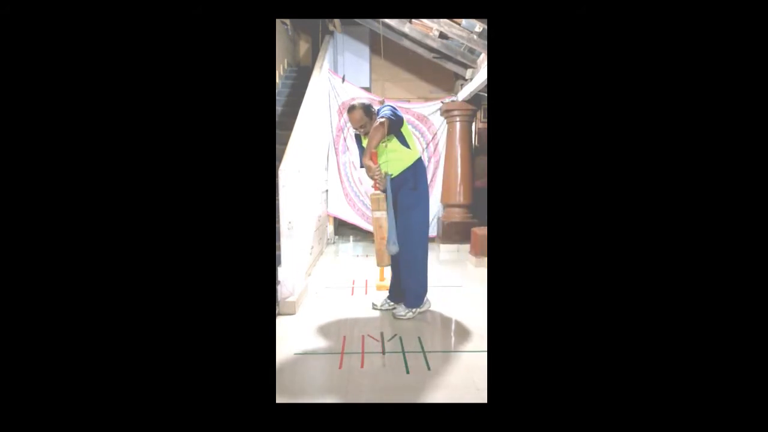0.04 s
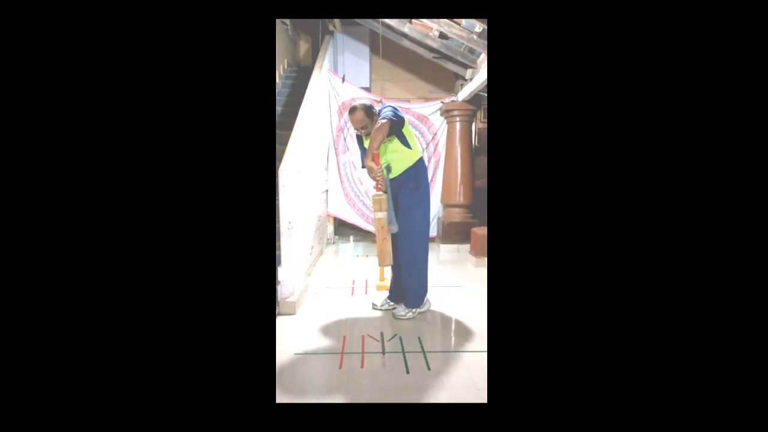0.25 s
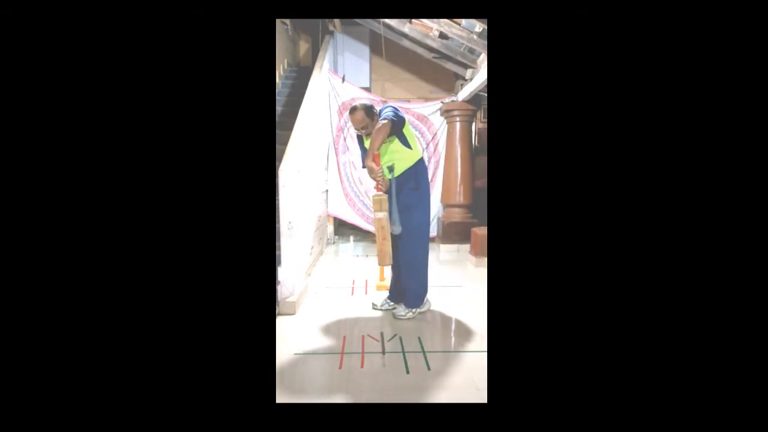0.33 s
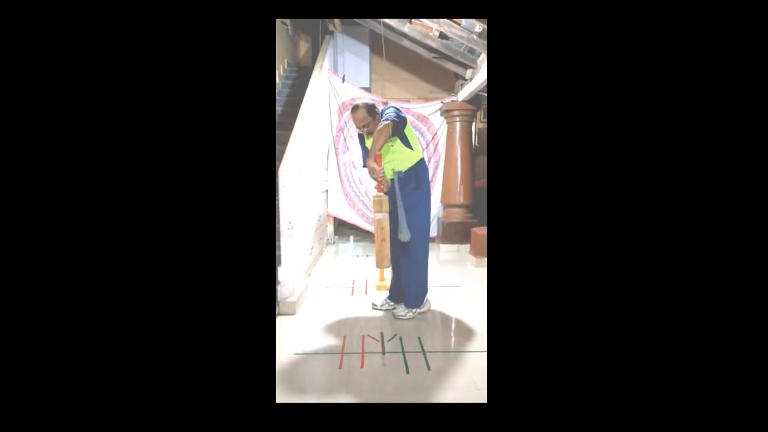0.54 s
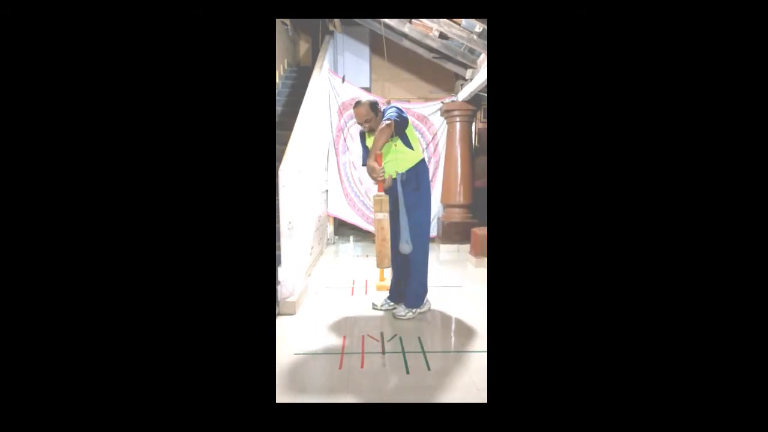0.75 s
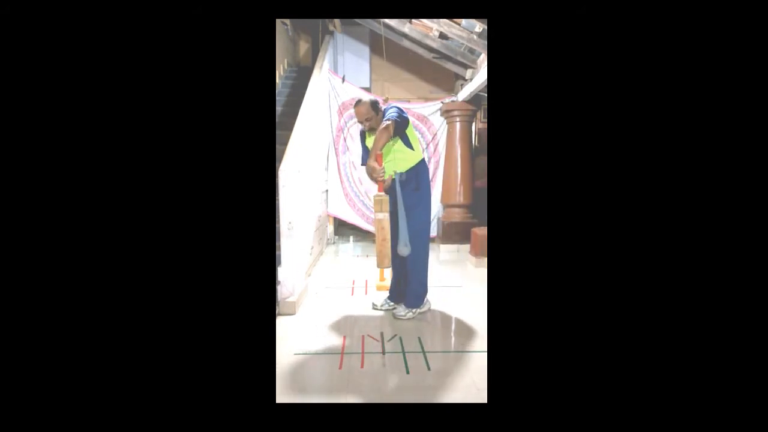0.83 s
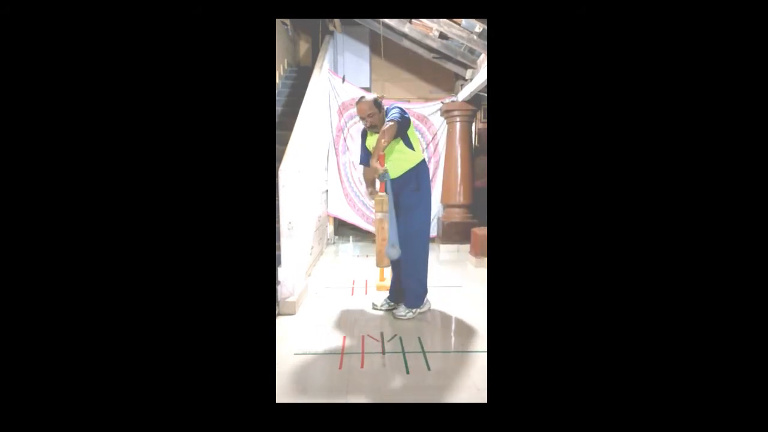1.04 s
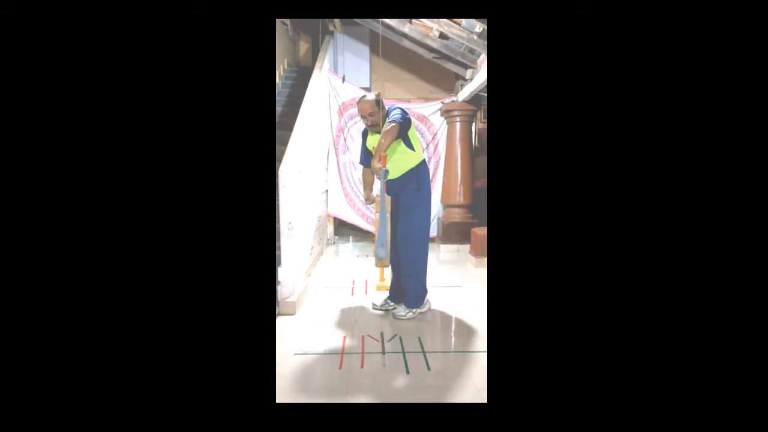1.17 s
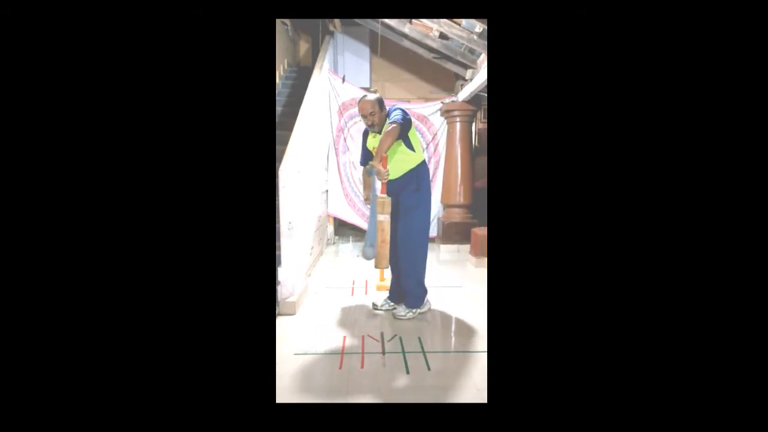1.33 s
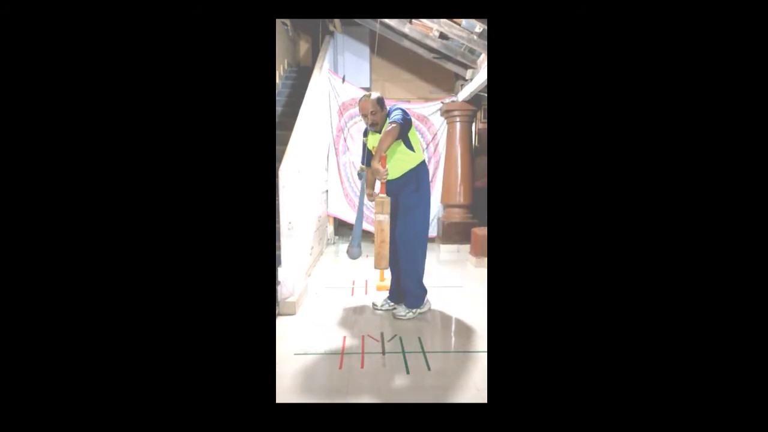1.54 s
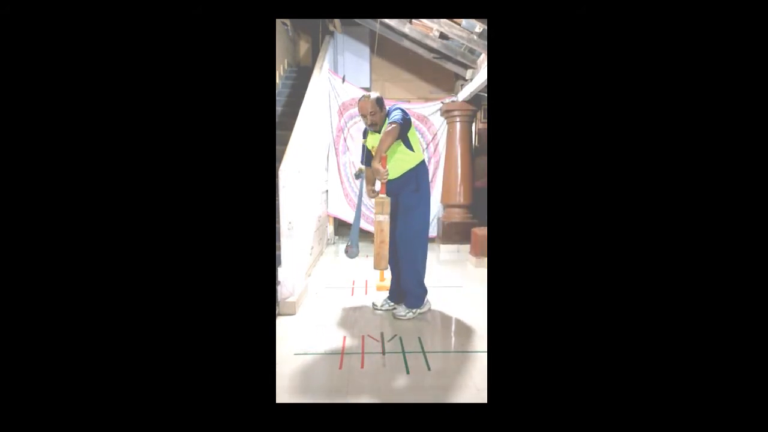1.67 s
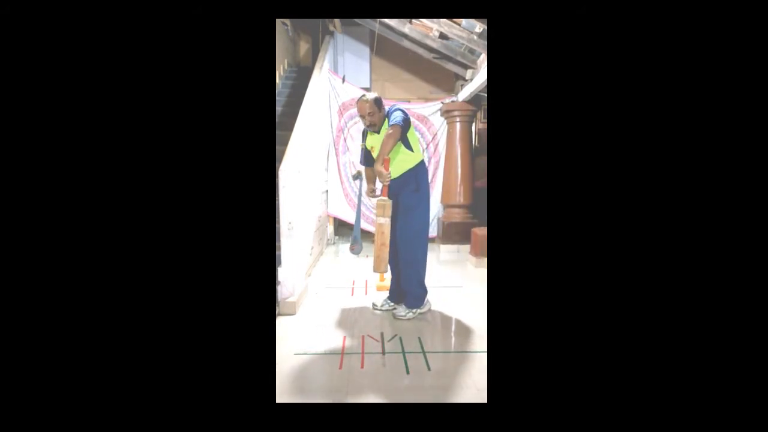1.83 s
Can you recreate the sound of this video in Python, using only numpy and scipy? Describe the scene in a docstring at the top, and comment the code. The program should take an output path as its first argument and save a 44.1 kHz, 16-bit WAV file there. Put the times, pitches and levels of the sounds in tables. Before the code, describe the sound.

At about 0.2 seconds a wooden cricket bat hits a hanging ball with one sharp knock, which rings in the hard room for roughly half a second. Faint rubbing from the cord follows. Near 1.1 seconds it becomes a quiet, thin squeal, drops to a lower buzzy squeak around 1.4 seconds, and jumps high again from 1.6 to about 1.9 seconds, over very faint room noise.

```python
"""Bat on a hanging cricket ball

One strike in a hard-floored practice room: the knock slaps off the walls and rings out.
The ball swings away with a faint rubbing, probably of its cord at the hanging point. On the way back
the rubbing turns into a stick-slip squeal, which drops to a lower, buzzier squeak and jumps up again."""
import sys
import numpy as np
from scipy import signal
from scipy.io import wavfile

SR = 44100
rng = np.random.default_rng(int(sys.argv[2]) if len(sys.argv) > 2 else 0)


def to_wav(s):
    """Save 16-bit WAV."""
    ch = np.atleast_2d(s).T  # columns
    pcm = np.round(np.clip(ch, -1, 1) * 32767)  # PCM
    wavfile.write(sys.argv[1], SR, pcm.astype(np.int16))


N = 83790
T = np.arange(N) / SR


def from_db(db):
    """Decibels to gain."""
    return 10 ** (np.asarray(db) / 20)


def rms_one(x):
    """Scale to rms 1."""
    return x / np.sqrt(np.mean(x ** 2) + 1e-20)


def in_time(rows):
    """Each column of a time curve at every sample."""
    time_s, *columns = np.transpose(rows)
    return [np.interp(T, time_s, column) for column in columns]


def at_hz(points, hz):
    """Interpolate on a log-frequency axis."""
    freq_hz, values = np.transpose(points)
    return np.interp(np.log(hz), np.log(freq_hz), values)


def pan(db):
    """Stereo gains, left over right by db."""
    return from_db(np.vstack([db, -db]) / 2)


def butter(x, hz, kind="low", order=2):
    """Butterworth filter."""
    return signal.sosfilt(signal.butter(order, hz, kind, fs=SR, output="sos"), x + 1e-18)


def delay(x, delay_s):
    """Shift later in time."""
    return np.interp(T - delay_s, T, x, left=0)


def decay(t60_s):
    """Envelope falling 60 dB in t60_s."""
    return from_db(-60 * T / t60_s)


def ring(hz, t60_s, phase_rad=0):
    """A struck mode of unit amplitude."""
    return np.sin(2 * np.pi * hz * T + phase_rad) * decay(t60_s)


def drift(rate_hz):
    """Smooth random wander, rms about 1."""
    pole = np.exp(-2 * np.pi * rate_hz / SR)
    wander = signal.lfilter([1], [1, -2 * pole, pole * pole], rng.standard_normal(2 * N))
    return rms_one(wander)[N:]


def slip_phase(hz, jitter):
    """Running phase of an unsteady stick-slip vibration."""
    return 2 * np.pi * np.cumsum(hz * (1 + jitter * drift(rate_hz=130))) / SR


def hoarse(phase, rasp, width_hz):
    """A partial of rms 1, from pure tone (rasp 0) to narrow-band noise (rasp 1)."""
    a, b = rms_one(butter(butter(rng.standard_normal((2, N)), width_hz), width_hz))
    steady = np.sqrt(2 * (1 - rasp ** 2)) * np.sin(phase)
    return steady + rasp * (a * np.sin(phase) + b * np.cos(phase))


# Diffuse field: freq_hz, left_right_correlation
COHERENCE = [(40, 1), (150, 0.88), (300, 0.82), (600, -0.0043), (1200, -0.21), (3000, 0.15), (6000, -0.13),
             (12000, 1)]


def noise_bands():
    """Third-octave bands of stereo room noise: centres and signals."""
    edges_hz = 22 * 2 ** (np.arange(30) / 3)
    centres_hz = np.sqrt(edges_hz[1:] * edges_hz[:-1])
    white = rng.standard_normal((2, 2, N + SR // 2))
    bands = []
    for k, alike in enumerate(at_hz(COHERENCE, centres_hz)):
        mid, side = butter(white[k % 2], edges_hz[k:k + 2], "band", order=3)[:, -N:]
        bands.append(np.sqrt(1 + alike) * mid + np.sqrt(1 - alike) * side * [[1], [-1]])
    return centres_hz, np.array(bands)


def coloured(noise, spectrum):
    """Noise bands summed under a spectrum, rms 1."""
    hz, bands = noise
    gains = from_db(at_hz(spectrum, hz))
    return rms_one(np.tensordot(gains, bands, 1))


# Background spectrum: freq_hz, relative_density_db
AIR_SPECTRUM = [(25, -3), (65, 6.5), (100, -10), (200, -2), (500, -16.5), (1500, -38.5), (4000, -31),
                (15000, -32)]


def still_air(level_db=-71):
    """Steady, mostly low room noise."""
    return from_db(level_db) * coloured(noise_bands(), AIR_SPECTRUM)


# Friction band levels before trim: time_s, low_db, middle_db, upper_db, hiss_db
RUB_LEVELS = [(0, -52, -52.5, -54.5, -63), (0.091, -46.5, -72.5, -65.5, -59),
              (.15, -50.5, -100, -67.5, -67.5), (0.198, -51.5, -79.5, -70.5, -76.5),
              (.42, -68, -49, -58, -86), (0.468, -54, -49.5, -55.5, -60), (0.539, -56, -45, -52.5, -62),
              (.62, -63.5, -56, -57.5, -72), (.7, -73, -51.5, -55, -89), (.77, -71, -56, -58, -69),
              (.85, -59, -53, -58, -72.5), (0.982, -62, -60, -63, -74.5), (1.062, -83, -68, -75, -88),
              (1.189, -85.5, -86.5, -94, -96), (1.27, -68.5, -73.5, -77, -58),
              (1.391, -71.5, -73.5, -62, -51), (1.551, -78.5, -61.5, -86, -76),
              (1.68, -73, -60, -63.5, -61), (1.78, -93, -64, -75, -68), (1.9, -93.5, -67, -85, -68.5)]
# Per band: trim_db
RUB_TRIMS = [0, 1, 1, 1]
# One spectrum per band: freq_hz, relative_density_db
RUB_SPECTRA = [
    [(60, -11.5), (160, -14.5), (300, -2.5), (470, 3), (560, -10.5), (700, -31), (1200, -54)],
    [(300, -47.5), (560, -14.5), (740, 3), (920, 5.5), (1100, -18), (2000, -60.5)],
    [(800, -50), (1300, -2.5), (1700, 1.5), (2800, -5), (3500, -19.5), (7000, -56)],
    [(2500, -49), (4000, -21), (4700, 4), (5150, 14.5), (5600, 9), (6200, -7.5), (7200, -22.5),
     (12000, -47)],
]


def rubbing():
    """Soft friction noise in four broad resonances."""
    noise = noise_bands()
    return sum(from_db(level_db + trim_db) * coloured(noise, spectrum)
               for level_db, trim_db, spectrum in zip(in_time(RUB_LEVELS), RUB_TRIMS, RUB_SPECTRA))


# Tones in the rubbing: start_s, length_s, start_hz, end_hz, width_hz, level_db
HOOT_GLIDES = [(0.129, 0.17, 910, 886, 17, -52.5), (0.437, 0.35, 888, 882, 28, -54.5),
               (0.462, 0.27, 681.3, 705.4, 28.6, -59), (1.099, 0.11, 1126, 1123, 48, -59.5),
               (1.104, 0.21, 1560, 1770, 84, -74.5), (1.212, 0.27, 579.4, 367.2, 50.5, -60.5),
               (1.3, 0.15, 2328, 2214, 151, -55.5), (1.321, 0.17, 996, 945, 46, -56.5),
               (1.464, 0.12, 523, 570, 58, -55), (1.654, 0.13, 1440, 1360, 40, -63),
               (1.776, 0.13, 749, 617, 61, -62.5)]


def hoots(fade_s=0.088):
    """Faint, hoarse gliding tones where the rubbing nearly catches."""
    out = 0
    for start_s, length_s, start_hz, end_hz, width_hz, level_db in HOOT_GLIDES:
        end_s = start_s + length_s
        fade = np.clip(np.minimum(T - start_s, end_s - T) / fade_s, 0, 1)
        pitch_hz = np.interp(T, [start_s, end_s], [start_hz, end_hz])
        phase = 2 * np.pi * np.cumsum(pitch_hz) / SR
        out += from_db(level_db) * fade * hoarse(phase, rasp=1, width_hz=width_hz)
    return out


# Low squeak: time_s, pitch_hz, level_db, fundamental_relative_db
SQUEAK_CURVE = [(1.32, 819, -100, -15), (1.355, 836, -44.5, -10), (1.41, 851, -41.5, -0.5),
                (1.48, 845.6, -42, 4), (1.525, 848.7, -39.5, 6.5), (1.6, 865.9, -41.5, -3.5),
                (1.67, 862, -54, -7), (1.71, 870, -83.5, -6.5)]
# Its overtones: harmonic_number, relative_db
SQUEAK_HARMONICS = [(2, -15.5), (3, 6), (4, 1.5), (5, -5.5), (6, -5.5), (7, -8), (8, -19), (9, -20.5),
                    (10, -30.5), (11, -28), (12, -21), (13, -26)]


def squeak():
    """Slower, buzzy stick-slip; the harder the contact grips, the fuller its top harmonics."""
    pitch_hz, level_db, fundamental_db = in_time(SQUEAK_CURVE)
    phase = slip_phase(pitch_hz, jitter=0.0053)
    tilt_db_per_harmonic = 0.35 * (level_db - level_db.max())
    wave = from_db(fundamental_db) * np.sqrt(2) * np.sin(phase)
    for harmonic, relative_db in SQUEAK_HARMONICS:
        gain = from_db(relative_db + tilt_db_per_harmonic * max(harmonic - 9.4, 0))
        wave += gain * hoarse(harmonic * phase, rasp=0.43, width_hz=61)
    gate = (T > SQUEAK_CURVE[0][0]) * (T < SQUEAK_CURVE[-1][0])
    return from_db(level_db) * rms_one(wave) * gate


# Squeal slip rate: time_s, pitch_hz, jitter_fraction
SQUEAL_GLIDE = [(1.05, 2775, .005), (1.16, 2805, .006), (1.25, 2800, .008), (1.29, 2850, .018),
                (1.38, 2820, .018), (1.6, 2900, .013), (1.71, 2878, .005), (1.745, 2805, .006),
                (1.8, 2864, .005), (1.86, 2860, .005), (1.9, 2895, .004)]
# Squeal strength: time_s, fundamental_db, octave_db, rasp_fraction, undertone_db, pan_db
SQUEAL_LEVELS = [(1.05, -88.5, -103, .27, -100, 2.5), (1.083, -55.5, -51, 0.27, -100, -8.5),
                 (1.14, -50, -51.5, 0.57, -105, 5.5), (1.2, -44, -44.5, 0.87, -78, 1),
                 (1.235, -46, -41.5, 1, -60, 5), (1.255, -37, -48.5, 0.55, -62, -6),
                 (1.275, -47.5, -51.5, 1, -59.5, 4.5), (1.31, -38, -47, 1, -75, -3),
                 (1.36, -46, -54, 1, -52, 6), (1.43, -61.5, -61, .7, -92, -9),
                 (1.59, -73, -73, 0.31, -84, 7), (1.615, -43, -55, 1, -61.5, 2),
                 (1.71, -43, -54.5, 0.45, -61, -3.5), (1.745, -45.5, -42, 0.79, -67.5, 2.5),
                 (1.8, -43, -56.5, 0.56, -67.5, -13.5), (1.9, -41, -52, 0.6, -92, 7.5)]


def squeal():
    """A high stick-slip whistle with rasp and undertones at thirds of its pitch."""
    pitch_hz, jitter = in_time(SQUEAL_GLIDE)
    fundamental_db, octave_db, rasp, undertone_db, pan_db = in_time(SQUEAL_LEVELS)
    phase = slip_phase(pitch_hz, jitter)
    under_phase = slip_phase(pitch_hz / 3, jitter=0.022)
    third_db = fundamental_db + octave_db + 19  # grows with both lower partials
    tone = 0
    for harmonic, level_db in enumerate([fundamental_db, octave_db, third_db], 1):
        flutter_db = 1.5 * drift(rate_hz=61)
        tone += from_db(level_db + flutter_db) * hoarse(harmonic * phase, rasp, width_hz=108)
    undertones = from_db(undertone_db) * sum(np.sin(k * under_phase) for k in (1, 2, 4, 5)) / np.sqrt(2)
    return pan(pan_db) * (tone + undertones) * (T > SQUEAL_LEVELS[0][0])


def in_room(x, direct_db=-2.5, air_loss_hz=6430):
    """Direct sound plus reverberation scattered differently to each side; the top dies sooner."""
    scatter = rng.standard_normal((2, N))
    low = butter(scatter, air_loss_hz, order=7) * decay(t60_s=0.42)
    high = butter(scatter, air_loss_hz, "high", order=7) * decay(t60_s=0.29)
    response = low + high
    response /= np.sqrt(np.sum(response ** 2) / 2)
    return from_db(direct_db) * x + signal.fftconvolve(x, response, axes=1)[:, :N]


# Knock reverberation: freq_hz, relative_density_db
TAIL_SPECTRUM = [(40, -33), (90, -28.5), (135, -10.5), (300, -2), (500, -1.5), (850, -9.5), (1150, -10),
                 (2500, -20), (3100, -29), (4000, -40), (5500, -31), (7500, -62), (12000, -57),
                 (16000, -73)]
# Its decay: freq_hz, t60_s
TAIL_DECAY = [(60, 1.9), (150, 0.56), (500, 0.46), (1000, 0.47), (2000, 0.36), (5000, .38), (11000, 0.68)]


def room_tail(level_db=-16.5, build_s=0.0066):
    """The knock's diffuse sound builds quickly and dies band by band."""
    hz, bands = noise_bands()
    gains = from_db(at_hz(TAIL_SPECTRUM, hz))
    tail = sum(gain * band * decay(t60_s) for gain, band, t60_s in zip(gains, bands, at_hz(TAIL_DECAY, hz)))
    tail /= np.std(np.tensordot(gains, bands, 1))
    return from_db(level_db) * tail * (1 - np.exp(-T / build_s))


# Room resonances: freq_hz, level_db, t60_s, pan_db
STANDING_WAVES = [(129.8, -24.5, 0.3, 0.5), (169.9, -22.5, 0.3, -1.5), (255.3, -23.5, 0.41, 1.5),
                  (294.6, -33, 0.44, 4), (372.7, -14, 0.2, 6.5), (429.3, -19, 0.37, 5.5),
                  (471, -26.5, 0.41, -6.5), (545.4, -25, 0.39, -9.5), (574, -19, .27, -7),
                  (667, -38.5, 0.92, 2), (687, -32.5, 0.34, -5.5), (1066, -23, 0.22, 3),
                  (1123, -29.5, 0.26, 10.5)]


def room_boom(build_s=0.01, skew_rad_per_hz=0.63 / 400):
    """Standing waves set off by the knock; shorter ones reach the two sides more out of step."""
    boom = 0
    for hz, level_db, t60_s, pan_db in STANDING_WAVES:
        skew_rad = skew_rad_per_hz * hz * rng.standard_normal((2, 1))
        boom += from_db(level_db) * pan(pan_db) * ring(hz, t60_s, skew_rad)
    return boom * (1 - np.exp(-T / build_s))


# First reflections: delay_s, level_db, pan_db, left_lag_s
REFLECTIONS = [(.0083, -3, 6.5, -.0005), (.0108, 0, -8, .0004), (.017, -3, -6, .0005), (.0255, 1.5, 2, 0),
               (.031, -9, 0, -.0005), (.0502, -6, -2, .0001), (.0655, -4, -1.5, 0)]


def wall_slaps(strike, cutoff_hz=1060):
    """Dulled copies of the strike come back off the walls."""
    dull = butter(strike, cutoff_hz)
    slaps = 0
    for delay_s, level_db, pan_db, lag_s in REFLECTIONS:
        sides = [delay(dull, delay_s + lag_s / 2), delay(dull, delay_s - lag_s / 2)]
        slaps += from_db(level_db) * pan(pan_db) * sides
    return slaps


def air_push(level_db=-18.5, half_width_s=0.00044):
    """One swing of pressure as ball and bat squeeze the air between them."""
    u = T / half_width_s - np.pi
    return from_db(level_db) * u * np.exp((1 - u ** 2) / 2)


# Bat resonances: freq_hz, level_db, t60_s
BAT_MODES = [(238.2, -17, 0.053), (430, -11, .022), (558, -11.5, .035), (640, -16.5, 0.069),
             (888, -23.5, 0.017), (1105, -23, .03), (1545, -30.5, 0.019), (1688, -23, 0.042),
             (2148, -22, 0.036), (2480, -37, .05), (2720, -38, .045), (5190, -50.5, 0.3)]


def bat_strike(contact_hz=2210, crack_db=-15, low_cut_hz=140):
    """Leather on willow: a push of air, a crack and the bat's modes."""
    crack = butter(butter(rng.standard_normal(N), contact_hz), contact_hz) * decay(t60_s=0.056)
    modes = sum((-1) ** k * from_db(level_db) * ring(hz, t60_s)
                for k, (hz, level_db, t60_s) in enumerate(BAT_MODES, 1))
    strike = air_push() + from_db(crack_db) * crack + modes
    return butter(strike, low_cut_hz, "high", order=4)  # deep bass rolled off, as by a phone microphone


def knock(start_s=0.2272):
    """The strike and the room's answer."""
    strike = bat_strike()
    stereo = strike + wall_slaps(strike) + room_boom() + room_tail()
    return np.array([delay(side, start_s) for side in stereo])


def scene():
    """The knock, the friction of the swing and still air."""
    friction_tones = in_room(squeal() + pan(db=1.5) * squeak() + hoots())
    return knock() + rubbing() + friction_tones + still_air()


def record(dry):
    """Steep low-pass at 15.8 kHz."""
    return signal.sosfilt(signal.ellip(10, .1, 80, 15800, fs=SR, output="sos"), dry)


dry = scene()
out = record(dry)
to_wav(out)
```